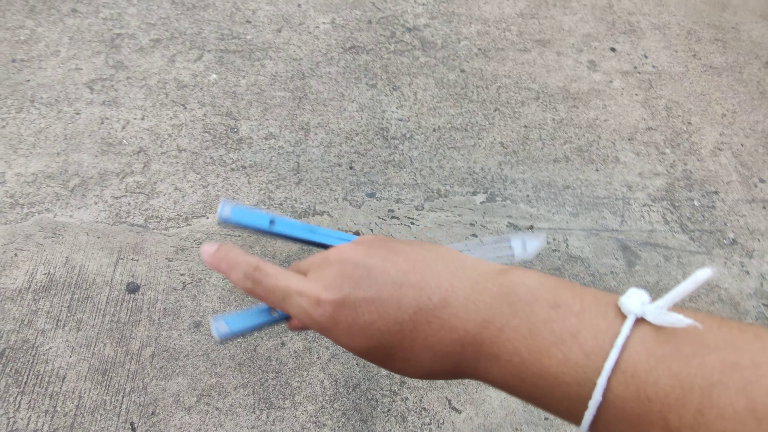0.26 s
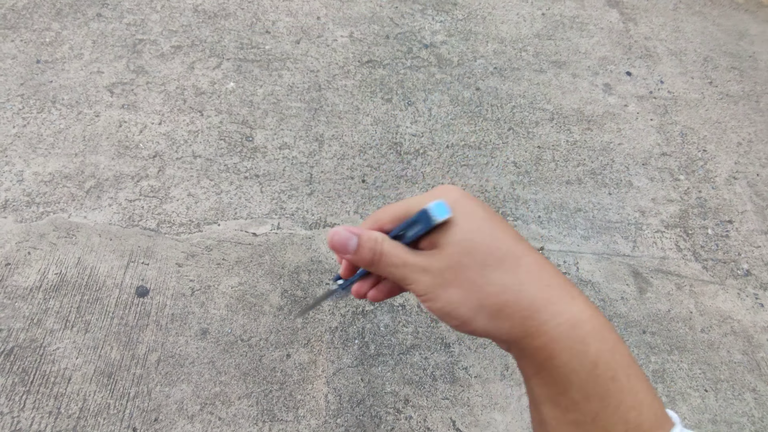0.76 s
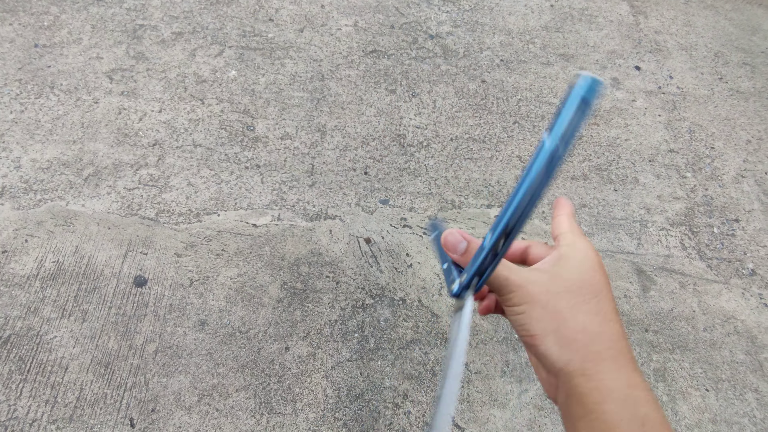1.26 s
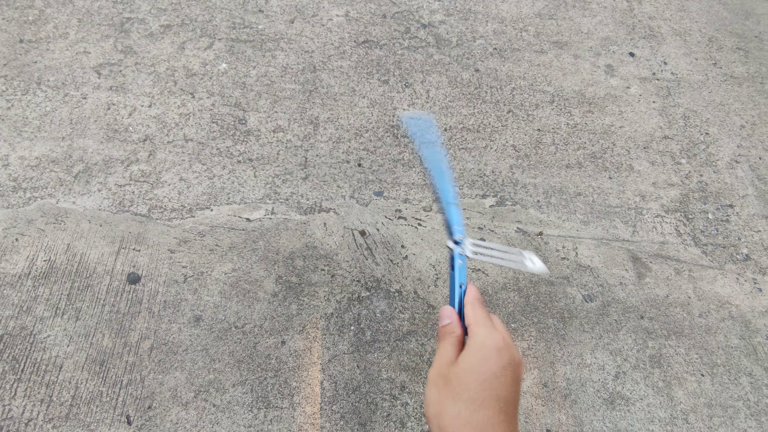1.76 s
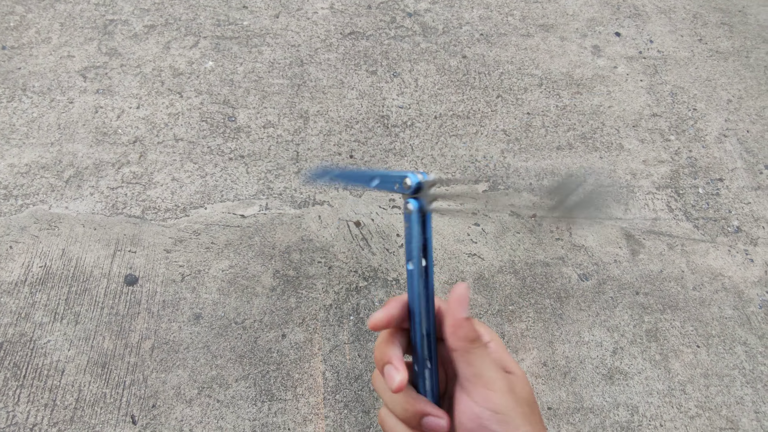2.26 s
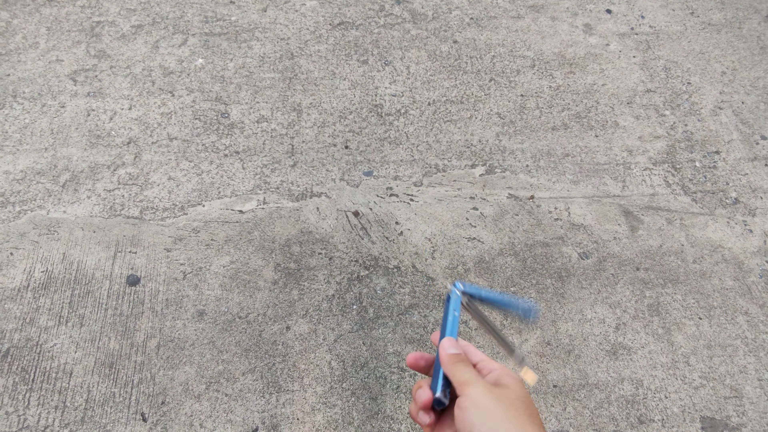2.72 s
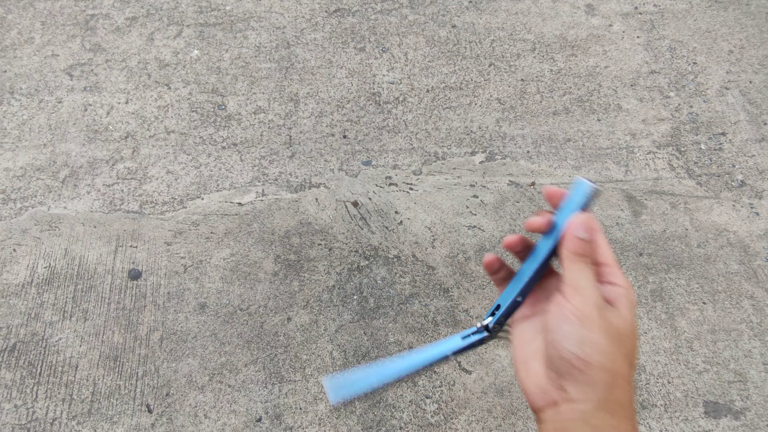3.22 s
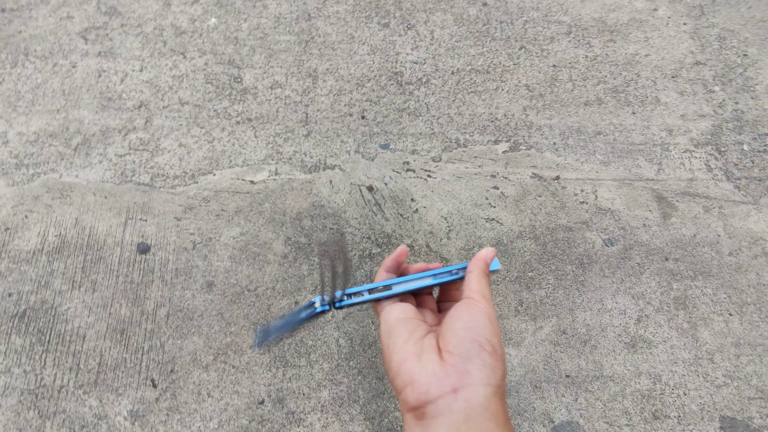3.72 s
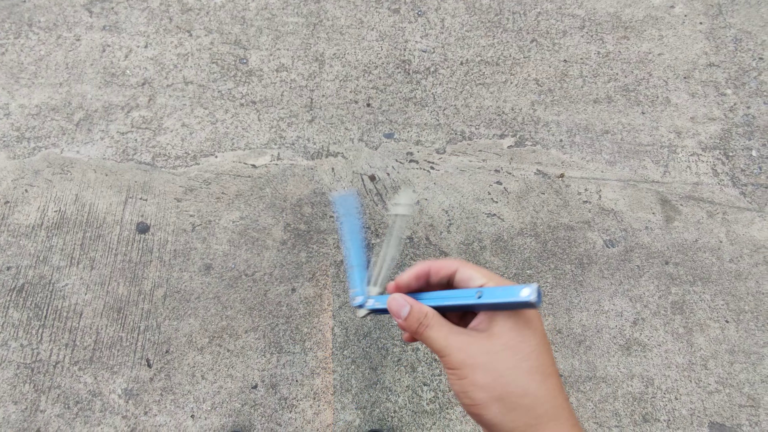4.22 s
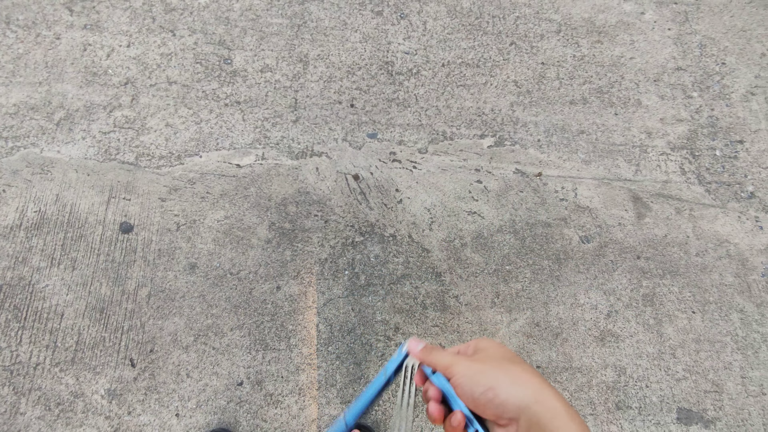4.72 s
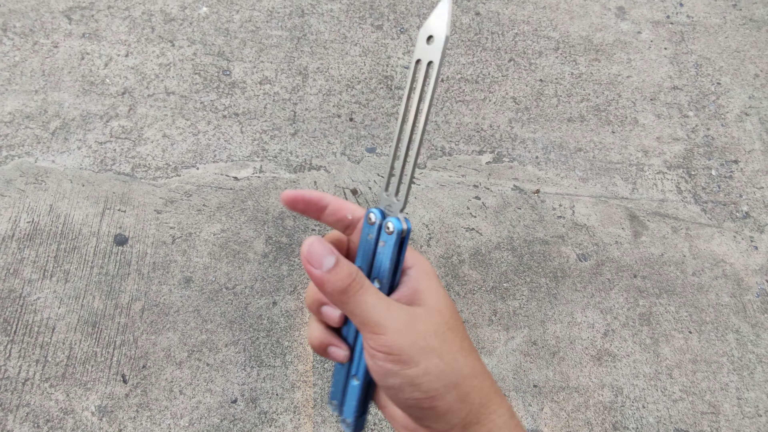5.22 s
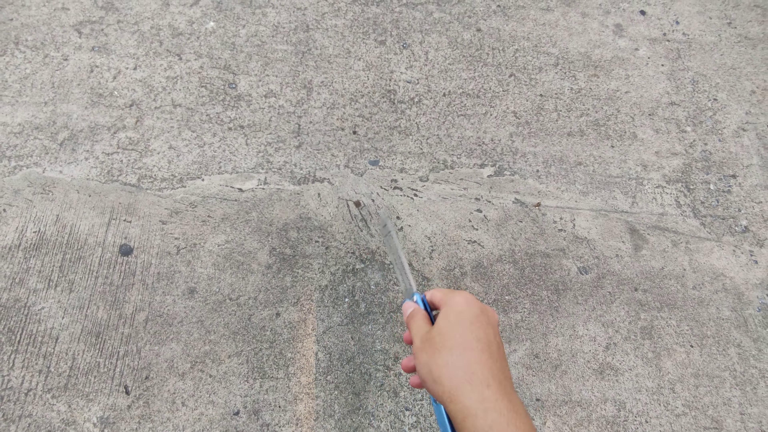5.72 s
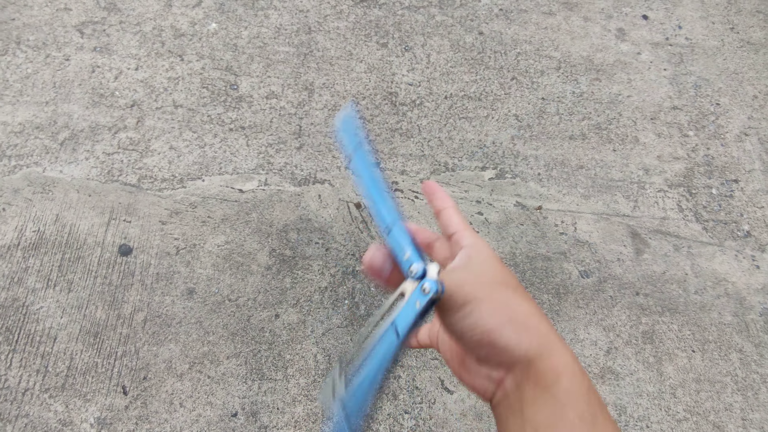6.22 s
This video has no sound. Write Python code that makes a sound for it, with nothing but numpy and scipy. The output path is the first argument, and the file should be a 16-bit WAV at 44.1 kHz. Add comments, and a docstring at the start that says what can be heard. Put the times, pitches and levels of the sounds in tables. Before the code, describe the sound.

Irregular hard metal clicks, some faint and some loud, with brief bright ringing and soft pivot scraping between them. The folding trainer is near and dry, with only faint outdoor reflections. Distant chirps repeat about twice a second over a low, steady traffic hum. Later, lumpy low wind thumps the small microphone, the handles shut with a clattering smack, and a few light ticks follow. The top end is slightly dull.

```python
"""A concrete yard: a butterfly-knife trainer is flipped by hand, close to a small microphone.
Handles, blade and stop pins clack and rattle through short resonances; sine modes ring until damped.
The pivots rub as grains of noise, and a dull noise burst is the handles slapping the palm.
Lumpy bands of noise buffet the microphone; two birds, gliding near sines, call in the distance
over a far traffic hum of shaped noise."""
import sys
import numpy as np
from scipy import signal
from scipy.fft import rfft, irfft
from scipy.io import wavfile

SR = 44100
rng = np.random.default_rng(int(sys.argv[2]) if len(sys.argv) > 2 else 0)


def persist_wave(psi):
    """Save psi, clipped to +-1, as 16-bit WAV."""
    counts = np.round(np.clip(psi, -1, 1) * 32767).astype(np.int16)
    wavfile.write(sys.argv[1], SR, np.atleast_2d(counts).T)


N = 285327

# swings of a handle in which its pivot rubs and ticks: (start [s], end [s], rubbing level [dB])
SWINGS = [(.02, .3, -62), (.46, .64, -52), (.66, .95, -62), (1.49, 1.79, -54), (2.47, 2.6, -60),
          (3.78, 3.9, -62), (4.88, 5.0, -60), (6.24, 6.36, -62)]


def amp(db):
    """Gain of a level in dB."""
    return 10 ** (np.asarray(db) / 20)


def rms_one(x):
    """Scaled to rms 1."""
    return x / np.sqrt(np.mean(x ** 2) + 1e-20)


def in_time(rows):
    """Each column of a curve table, sample by sample."""
    s, *columns = np.transpose(rows)
    return [np.interp(np.arange(N) / SR, s, c) for c in columns]


def drift(rate_hz):
    """Slow chance: noise twice through a one-pole low-pass; mean 0, spread 1."""
    r = np.exp(-2 * np.pi * rate_hz / SR)
    noise = rng.standard_normal(N + SR)
    slow = signal.lfilter([1], [1, -2 * r, r * r], noise)[SR:]   # the first second lets it settle
    return rms_one(slow - slow.mean())


def coloured(spectrum):
    """Noise with the given spectrum, drawn over log frequency; rms 1."""
    hz, db = np.transpose(spectrum)
    grid = np.fft.rfftfreq(N, 1 / SR) + 1   # 1 Hz up, to keep clear of log 0
    gain = amp(np.interp(np.log(grid), np.log(hz), db))
    return rms_one(irfft(rfft(rng.standard_normal(N)) * gain, N))


def resonate(x, peaks):
    """Parallel two-pole resonances of alternating sign."""
    out = 0
    for k, (hz, width, db) in enumerate(peaks):
        r = np.exp(-np.pi * width / SR)
        b = (1 - r * r) / 2 * np.array([1, 0, -1])
        a = [1, -2 * r * np.cos(2 * np.pi * hz / SR), r * r]
        out = out + (-1) ** k * amp(db) * signal.lfilter(b, a, x + 1e-18)
    return out


def far_hum(level_db, waver_db):
    """Far traffic and air: steady shaped noise whose level wavers slowly."""
    # hum at the microphone: (frequency [Hz], relative level [dB per Hz])
    hum_spectrum = [(180, -26.5), (300, -12), (427, 0.5), (668, -9), (889, -11.5), (1230, -19.5),
                    (1410, -16.5), (1680, -17.5), (2040, -15), (4120, -32), (5410, -35), (7190, -24),
                    (7700, -28), (10000, -64.5), (16900, -120)]
    return amp(level_db + waver_db * drift(6.2)) * coloured(hum_spectrum)


def buffets():
    """Power of single eddies bursting on the port, middle and upper band: each swells, holds and falls."""
    # (start [s], length [s], level [dB], upper band relative to that level [dB])
    bursts = [(2.464, 0.053, -33, -25), (2.957, 0.045, -38, -25), (3.54, 0.046, -30.5, -23),
              (3.597, 0.033, -29, -14), (3.706, 0.024, -25.5, -14), (3.773, 0.049, -31.5, -10.5),
              (3.879, 0.11, -30, -16), (4.025, 0.021, -23, -9.5), (4.051, 0.015, -19.5, -16),
              (4.074, 0.027, -15, -14.5), (4.122, 0.036, -18.5, -11), (4.187, 0.045, -19, -10.5),
              (4.277, .055, -20, -8.5), (4.362, 0.022, -17, -21.5), (4.407, 0.057, -17.5, -7),
              (4.476, 0.045, -17.5, -8.5), (4.537, 0.06, -21, -6.5), (4.612, .055, -23, -9.5),
              (4.702, 0.053, -21.5, -4), (4.742, 0.052, -17, -6.5), (4.822, .04, -20, -9),
              (4.904, 0.02, -20, -13.5), (4.966, 0.034, -24.5, -30), (5.05, 0.06, -24, -14),
              (5.307, 0.027, -28.5, -30), (5.409, 0.05, -19, -7), (5.507, 0.042, -21, -15.5),
              (5.563, 0.081, -19, -8.5), (5.792, 0.024, -20.5, -24), (5.845, 0.03, -17, -17),
              (5.948, 0.044, -24.5, -20), (6.103, 0.076, -26.5, -23), (6.171, 0.017, -13.5, -8.5),
              (6.215, 0.052, -24.5, -3.5), (6.273, 0.019, -22, -5), (6.301, 0.056, -21.5, -8),
              (6.405, 0.071, -26, -23)]
    rise_s, fall_s = .008, .0071
    bright_rise_s, bright_t60_s = .0017, .53   # the upper band starts quickly and fades
    t, power = np.arange(N) / SR, np.zeros((2, N))
    for s, length, db, bright_db in bursts:
        body = np.clip((t - s) / rise_s + .5, 0, 1)
        bright_rise = np.clip((t - s) / bright_rise_s, 0, 1)
        bright = bright_rise * amp(bright_db - 60 * np.abs(t - s) / bright_t60_s)
        fall = np.clip((s + length - t) / fall_s + 1, 0, 1)
        power += (amp(db) * fall * [body, bright]) ** 2
    return power


def wind(shared_db, own_db, lumps_hz):
    """Eddies at the port: three bands of rumble, lumpy together and each on its own."""
    # steady wind on the microphone: (time [s], middle band level [dB], deepest rumble level [dB])
    steady = [(0, -42, -43), (1.5, -43.5, -45.5), (1.98, -43.5, -45.5), (2.15, -42, -33.5),
              (2.25, -41, -44.5), (2.47, -40.5, -32.5), (2.7, -42.5, -42.5), (3.4, -42.5, -39),
              (3.56, -37.5, -34), (4.0, -28.5, -37.5), (4.5, -30.5, -31), (4.85, -25.5, -25.5),
              (5.05, -32.5, -26.5), (5.15, -38, -34), (5.4, -34.5, -28.5), (5.6, -27, -26.5),
              (5.75, -25, -39.5), (6.05, -34, -29), (6.47, -29.5, -35)]
    # rumble of the deepest band: (frequency [Hz], relative level [dB per Hz])
    deep_spectrum = [(20, -42.5), (32, -20), (50, 13), (85, 20.5), (130, 14), (200, -48.5)]
    # rumble of the middle band: (frequency [Hz], relative level [dB per Hz])
    mid_spectrum = [(70, -18), (130, 1), (220, 1), (310, -4.5), (450, -30), (700, -85)]
    # flutter of the upper band: (frequency [Hz], relative level [dB per Hz])
    top_spectrum = [(200, -32), (350, 1), (520, -6), (800, -18.5), (1200, -41.5), (1800, -71)]
    calm_top_db, top_follows = -9, .43   # upper band in calm air; share of the level's rise it follows
    buffet_deep_db = -14.5   # deepest band of a buffet, relative to its middle band
    level_db, deep_db = in_time(steady)
    calm_db = level_db.min()
    top_db = calm_db + calm_top_db + top_follows * (level_db - calm_db)
    steady_power = amp([level_db, top_db, deep_db]) ** 2
    body, bright = buffets()
    buffet_power = [body, bright, body * amp(2 * buffet_deep_db)]
    mid, top, deep = np.sqrt(steady_power + buffet_power)
    lumps = shared_db * drift(lumps_hz)
    out = 0
    for spectrum, gain in [(mid_spectrum, mid), (top_spectrum, top), (deep_spectrum, deep)]:
        lumpy = coloured(spectrum) * amp(lumps + own_db * drift(lumps_hz))
        out = out + gain * rms_one(lumpy)
    return out


def pivots(grains_per_s, fade_s):
    """Dense tiny slips of the dry pivot into the metal while a handle swings."""
    # resonances of the rubbed metal: (frequency [Hz], width [Hz], relative level [dB])
    rub_tone = [(2350, 110, 0), (2520, 200, -7), (6800, 1500, -20)]
    t, level = np.arange(N) / SR, np.zeros(N)
    for start, end, db in SWINGS:
        level += amp(db) * np.interp(t, [start, start + .0054, end - fade_s, end], [0, 1, 1, 0])
    grains = (rng.random(N) < grains_per_s / SR) * rng.standard_normal(N)
    slips = grains * amp(1.5 * drift(30))
    return level * rms_one(resonate(slips, rub_tone))


def pivot_ticks(per_swing):
    """Faint ticks of play in the pivots at chance moments of each swing, as rows like the clacks."""
    count = len(SWINGS) * per_swing
    luck, size = rng.random((count, 3)), rng.standard_normal((count, 2))
    start, end, _ = np.repeat(SWINGS, per_swing, axis=0).T
    s = start + luck[:, 0] * (end - start)
    treble_db, body_db = -48 + 3 * size[:, 0], -49 + 3 * size[:, 1]
    treble_hz, body_hz = 5800 + 1700 * luck[:, 1], 2050 + 700 * luck[:, 2]
    return np.c_[s, treble_db, treble_hz, body_db, body_hz]


def strike(touches, hz, t60):
    """Each row of touches rings a short mode at that row's pitch."""
    after = np.arange(2000) / SR
    mode = amp(-60 * after / t60) * np.sin(2 * np.pi * hz[:, None] * after)
    return signal.fftconvolve(touches, mode, axes=1)[:, :touches.shape[1]]


def knife(share, rattle_db, rattle_t60, loose_share, loose_db, loose_t60, high_db, low_db):
    """A contact, a dense short rattle, then sparse ticks of loose pins; grip and place favour one pitch."""
    # metal on metal, levels of the contact before the metal's resonances:
    # (time [s], treble level [dB], treble pitch [Hz], low body level [dB], low body pitch [Hz])
    clacks = [(0.184, -40.5, 7360, -38, 2100), (0.2446, -35.5, 7350, -42, 2100),
              (0.4648, -44, 6440, -37, 2360), (0.507, -36.5, 7000, -33.5, 2420),
              (0.5208, -35.5, 6400, -32.5, 3100), (0.5838, -30, 6300, -39, 2900),
              (0.5974, -30.5, 4830, -44, 2120), (0.6501, -15, 7580, -19.5, 3090),
              (0.7889, -20, 7570, -19.5, 2640), (0.9038, -20, 7830, -23.5, 2710),
              (0.9476, -45, 6800, -35, 2340), (1.0734, -34.5, 7540, -41, 2500),
              (1.142, -42.5, 6460, -50, 2100), (1.204, -36.5, 6920, -45, 2000),
              (1.2683, -36, 6400, -54, 2590), (1.492, -33, 7470, -46, 2140), (1.5684, -47, 7440, -61, 2370),
              (1.721, -19.5, 7840, -47, 2340), (1.7319, -20, 7200, -29, 2450),
              (1.7844, -37, 6860, -59, 2210), (1.8153, -36, 7540, -48, 2470),
              (1.9744, -27, 7400, -25.5, 2300), (1.9788, -15, 7670, -27, 2680),
              (2.1931, -9, 7250, -18.5, 2580), (2.2201, -42, 7440, -42, 2290),
              (2.232, -34, 7500, -41.5, 2480), (2.755, -25.5, 5520, -56, 2430),
              (2.764, -20.5, 5750, -32.5, 2490), (3.15, -41, 5010, -41, 2300),
              (3.1603, -36, 7100, -42, 2010), (3.1782, -19, 7470, -34, 2840),
              (3.1837, -29, 7160, -32.5, 2800), (3.458, -31, 6900, -46, 2130),
              (3.4652, -12, 6000, -15.5, 2790), (3.4746, -19, 7340, -27, 2460),
              (3.4928, -24, 6440, -25, 2280), (3.5855, -32, 7050, -29.5, 2650),
              (3.7032, -23, 5440, -24, 2740), (3.707, -16, 6800, -25.5, 2470),
              (3.7905, -39.5, 6360, -49, 2420), (3.857, -39, 6060, -35, 2310),
              (3.9128, -17, 7520, -16, 3024), (3.917, -20, 7050, -39, 2900), (3.925, -29, 6800, -32, 3080),
              (4.102, -36, 7000, -40, 2910), (4.1116, -34.5, 7500, -39, 2530),
              (4.1441, -20, 6200, -28.5, 3580), (4.1474, -7, 7450, -27, 2660),
              (4.1553, -30, 6800, -28, 2380), (4.165, -27.5, 6200, -45, 2350),
              (4.414, -42, 7320, -50, 3370), (4.6178, -28, 7100, -34.5, 2080),
              (4.726, -37.5, 7200, -48, 2210), (4.7576, -8.5, 7700, -19, 2530),
              (4.771, -25, 6400, -32, 2900), (4.8785, -26.5, 6470, -33, 2400),
              (4.9075, -33, 6300, -52, 2110), (5.1096, -46, 6940, -45, 3300),
              (5.2015, -19, 7100, -20, 3020), (5.2453, -7, 7340, -8.5, 2590),
              (5.2505, -9, 5130, -11.5, 2255), (5.256, -18, 6660, -12.5, 3100),
              (5.269, -13.5, 6300, -22, 3000), (5.2811, -15.5, 7500, -28, 2980),
              (5.3034, -32, 7150, -36, 2780), (5.677, -39, 7940, -64, 2740),
              (6.246, -30.5, 7110, -51, 2520), (6.2656, -32, 7630, -41, 3070),
              (6.3098, -34, 7080, -42, 2470), (6.3311, -22, 5940, -28.5, 2360),
              (6.3397, -23.5, 6730, -36, 2260)]
    # short low resonances of the gripped metal: (frequency [Hz], width [Hz], relative level [dB])
    body_low = [(875, 220, -14), (1470, 3000, -10), (2385, 396, 3), (3010, 1300, 3.5), (3273, 790, 9)]
    # short high resonances of the gripped metal: (frequency [Hz], width [Hz], relative level [dB])
    body_high = [(4410, 580, -9), (4720, 440, -6), (6303, 160, 11), (6420, 380, 6), (7894, 1120, 11.5)]
    s, treble_db, treble_hz, body_db, body_hz = np.r_[clacks, pivot_ticks(per_swing=4)].T
    span = 5000   # samples of touching after each contact
    after = np.arange(span) / SR
    luck, sizes = rng.random((len(s), span)), rng.standard_normal((len(s), span))
    rattle = (luck < share) * amp(rattle_db - 60 * after / rattle_t60)
    loose = (luck < loose_share) * amp(loose_db - 60 * after / loose_t60)
    touches = sizes * (rattle + loose)
    touches[:, 0] = 1   # the contact itself
    bright = touches * amp(treble_db)[:, None]
    full = touches * amp(body_db)[:, None]
    favoured = amp(-7) * strike(bright, treble_hz, t60=.008)
    favoured += amp(-3) * strike(full, body_hz, t60=.017)
    high, low, tone = np.zeros((3, N + span))
    for k, i in enumerate(np.round(s * SR).astype(int)):
        high[i:i + span] += bright[k]
        low[i:i + span] += full[k]
        tone[i:i + span] += favoured[k]
    treble = amp(high_db) * resonate(high[:N], body_high)
    body = amp(low_db) * resonate(low[:N], body_low)
    return treble + body + tone[:N]


def ring(waver_db, damp_t60):
    """Each mode and its close partner ring until the hand closes on the part; spinning makes them waver."""
    # moments when the parts ring freely: (time [s], time until the hand damps it [s],
    # blade low [dB], blade high [dB], handle low [dB], handle high [dB])
    rings = [(.651, 0.074, -70, -66, -70, -48), (.79, 0.034, -73, -68, -55, -58),
             (.903, 0.043, -44, -61, -63, -49), (.948, 0.13, -67, -63, -74, -70),
             (1.732, 0.11, -56, -64, -72, -50.5), (1.978, 0.25, -48, -65, -52.5, -49),
             (2.194, 0.28, -53.5, -54.5, -56, -39), (2.762, 0.055, -54, -53, -63, -54),
             (3.469, 0.028, -85, -77, -69, -64), (3.705, 0.088, -55, -71, -68, -68),
             (3.915, 0.053, -53, -66, -59, -42.5), (4.149, 0.21, -42.5, -45, -58, -41),
             (4.368, 0.26, -66, -69, -72, -64), (4.759, 0.15, -63.5, -63, -57, -41),
             (4.879, 0.18, -62, -59, -68, -55), (4.908, 0.089, -48, -67, -72, -70),
             (5.203, 0.05, -50.5, -56, -50.5, -58), (5.252, 0.14, -49, -46, -34.5, -52)]
    # blade low, blade high, handle low, handle high: (frequency [Hz], t60 [s],
    # close partner [Hz], partner's relative level [dB], partner's t60 [s])
    modes = [(2250, .6, 2330, -6, .15), (6180, .7, 6360, -8, .08), (2870, .3, 2990, 3, .13),
             (6850, .2, 7000, -8, .12)]
    span = SR // 2
    out, after = np.zeros((len(modes), N + span)), np.arange(span) / SR
    for s, free_s, *strength_db in rings:
        held = amp(-60 * np.maximum(after - free_s, 0) / damp_t60)
        for k, (hz, t60, near_hz, near_db, near_t60) in enumerate(modes):
            pair = amp(-60 * after / t60) * np.sin(2 * np.pi * hz * after)
            pair += amp(near_db - 60 * after / near_t60) * np.sin(2 * np.pi * near_hz * after)
            out[k, int(s * SR):][:span] += amp(strength_db[k]) * held * pair
    return sum(amp(waver_db * drift(30)) * mode[:N] for mode in out)


def bird(calls, shape, rough):
    """A near sine follows the call's shape, slightly hoarse."""
    out, (after, hz, db) = np.zeros(N + SR), np.transpose(shape)
    t = np.arange(int(after[-1] * SR)) / SR
    phase = 2 * np.pi * np.cumsum(np.interp(t, after, hz)) / SR
    call = amp(np.interp(t, after, db)) * np.sin(phase)
    for s, level_db in calls:
        out[int(s * SR):][:len(t)] += amp(level_db) * call
    return out[:N] * (1 + rough * drift(270))


def distance(x, wall_s, wall_db, tail_db, t60):
    """One wall answers a far sound; scattered reflections off houses and trees smear it."""
    t = np.arange(SR // 2) / SR
    tail = rng.standard_normal(len(t)) * amp(-60 * t / t60)
    tail = tail / np.sqrt(np.sum(tail ** 2))
    wall = np.pad(x, (int(wall_s * SR), 0))[:N]
    smear = signal.fftconvolve(x, tail)[:N]
    return x + amp(wall_db) * wall + amp(tail_db) * smear


def chirping_bird():
    """A far bird whose short call sweeps up, then down."""
    # calls: (time [s], level before the call's shape [dB])
    chirps = [(.062, -62), (.528, -60), (1.022, -56), (1.567, -57), (2.087, -59), (2.61, -60), (3.12, -61),
              (3.635, -61), (4.835, -64), (5.385, -61), (5.985, -64)]
    # shape of a call: (time from start [s], pitch [Hz], relative level [dB])
    chirp_shape = [(0, 4400, -10), (.012, 5320, -4), (.03, 5150, -5), (.036, 5400, -1), (.045, 5000, 1.5),
                   (.058, 4600, 1.5), (.075, 4100, -9), (.1, 3300, -16), (.11, 3100, -26)]
    return distance(bird(chirps, chirp_shape, rough=.3), wall_s=.068, wall_db=-7, tail_db=-1.5, t60=.55)


def whistling_bird():
    """A far bird whose short whistle glides upward."""
    # calls: (time [s], level before the call's shape [dB])
    whistles = [(3.27, -50), (4.435, -53), (5.675, -57)]
    # shape of a call: (time from start [s], pitch [Hz], relative level [dB])
    whistle_shape = [(0, 6250, -16), (.02, 6430, -4), (.045, 6500, -6), (.06, 6650, -3), (.07, 6880, 0),
                     (.09, 7200, 0), (.105, 7500, -3), (.115, 7600, -18)]
    return distance(bird(whistles, whistle_shape, rough=.4), wall_s=.03, wall_db=-14, tail_db=-2, t60=.6)


def slap():
    """A short low burst as the palm stops the closing handles."""
    # handles shut in the palm: (time [s], length [s], level [dB])
    palm_stop = (5.2455, 0.017, -24)
    # low bands of the thud, passed twice: (frequency [Hz], width [Hz], relative level per pass [dB])
    palm_bands = [(330, 370, 2.5), (800, 620, -3)]
    s, length, db = palm_stop
    t = np.arange(N) / SR
    thud = resonate(resonate(rng.standard_normal(N), palm_bands), palm_bands)
    return amp(db) * ((t > s) & (t < s + length)) * rms_one(thud)


def yard_echoes(x, wall_cut_hz):
    """A few faint early echoes off the ground and walls, nearly as bright as the metal."""
    # ground and walls: (delay [s], level [dB])
    echoes = [(.006, -13), (0.03, -26), (.052, -35)]
    reflected = signal.lfilter(*signal.butter(1, wall_cut_hz, fs=SR), x)
    return x + sum(amp(db) * np.pad(reflected, (int(s * SR), 0))[:N] for s, db in echoes)


def scene():
    """Knife close by and birds far off, wind and far hum at the microphone."""
    hum = far_hum(level_db=-49, waver_db=.59)
    gusts = wind(shared_db=1.3, own_db=2.0, lumps_hz=55.5)
    rubbing = pivots(grains_per_s=3900, fade_s=.042)
    clacks = knife(share=.09, rattle_db=-7, rattle_t60=.018,
                   loose_share=.006, loose_db=-15, loose_t60=.13, high_db=14, low_db=16)
    metal = rubbing + clacks + ring(waver_db=5.0, damp_t60=.06) + slap()
    birds = chirping_bird() + whistling_bird()
    return (yard_echoes(metal, wall_cut_hz=21000) + birds + gusts + hum)[None]


def record(dry):
    """The small microphone loses the deepest bass; the top is cut steeply."""
    heard = signal.sosfilt(signal.butter(2, 30, "high", fs=SR, output="sos"), dry)
    heard = signal.sosfilt(signal.butter(4, 8600, fs=SR, output="sos"), heard)
    return signal.sosfilt(signal.ellip(10, .5, 48, 7560, fs=SR, output="sos"), heard)


dry = scene()
out = record(dry)
persist_wave(out)
```